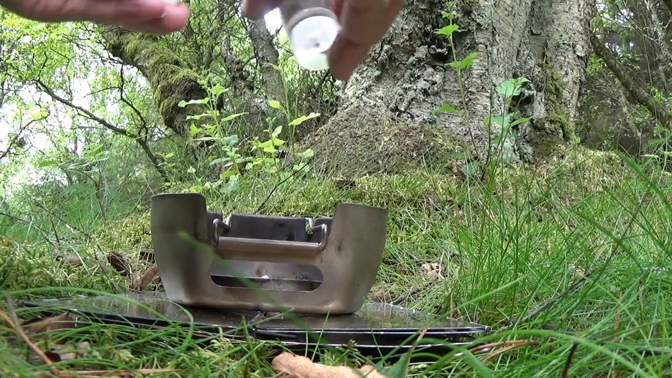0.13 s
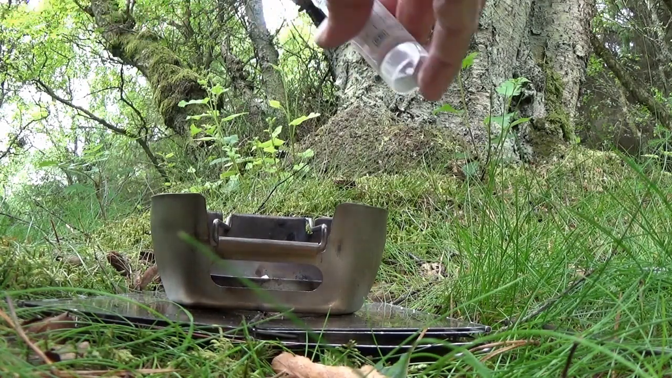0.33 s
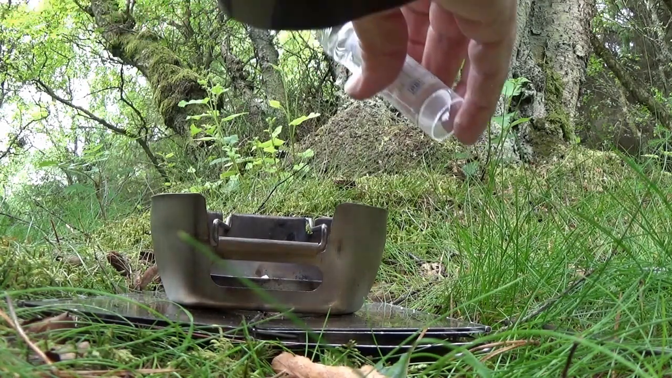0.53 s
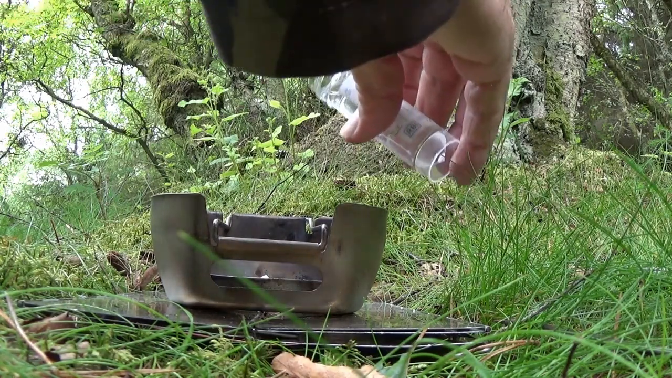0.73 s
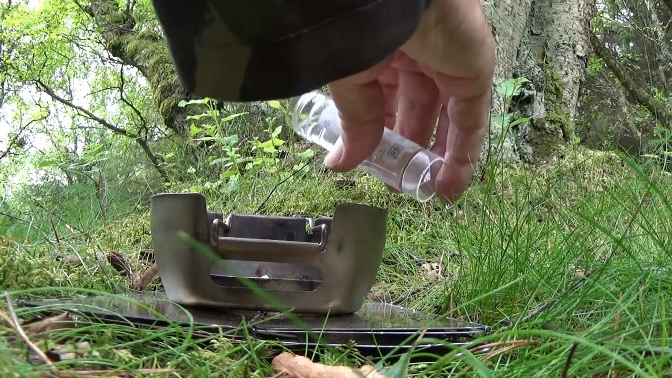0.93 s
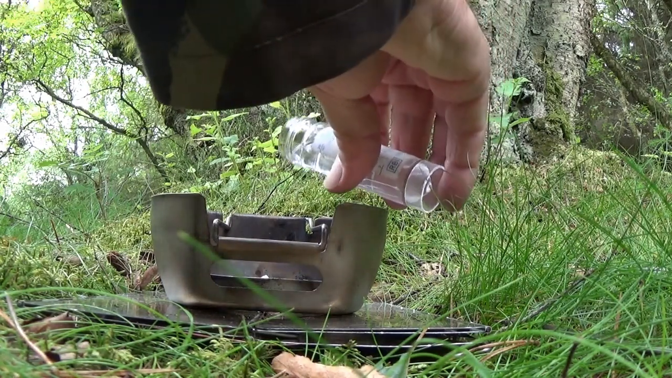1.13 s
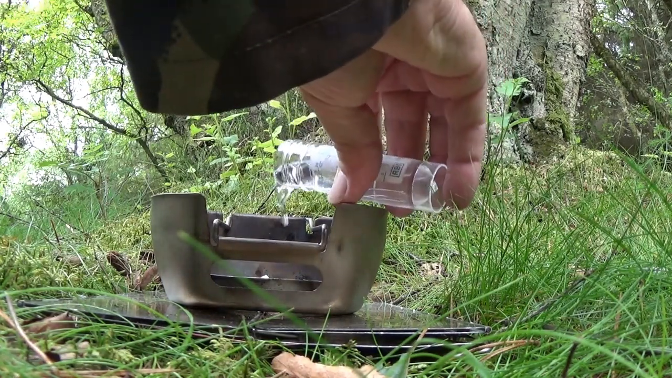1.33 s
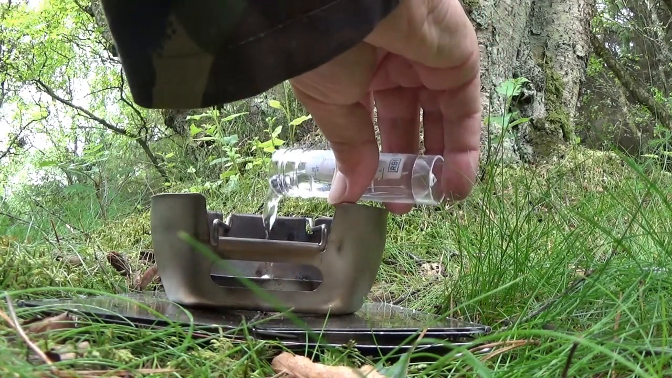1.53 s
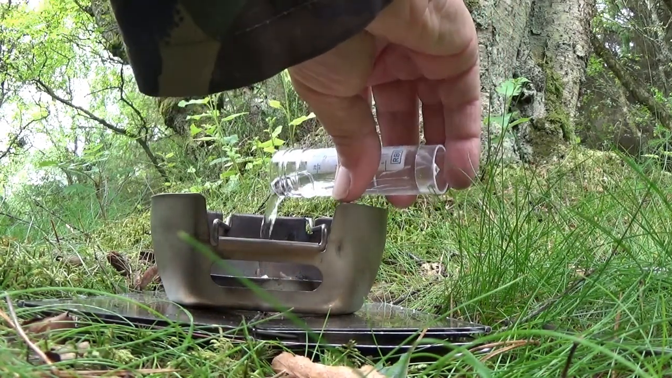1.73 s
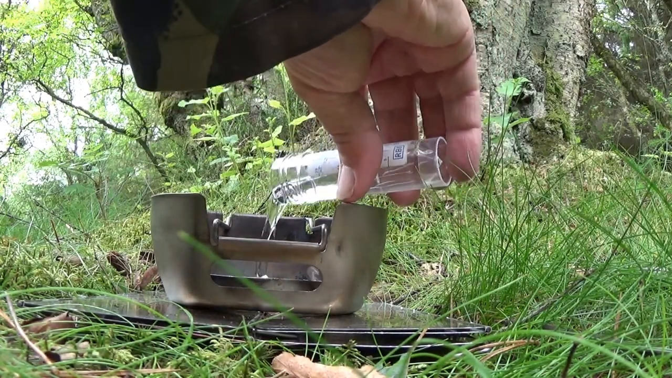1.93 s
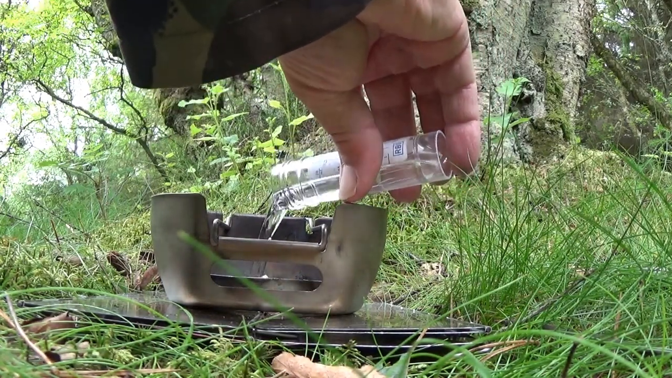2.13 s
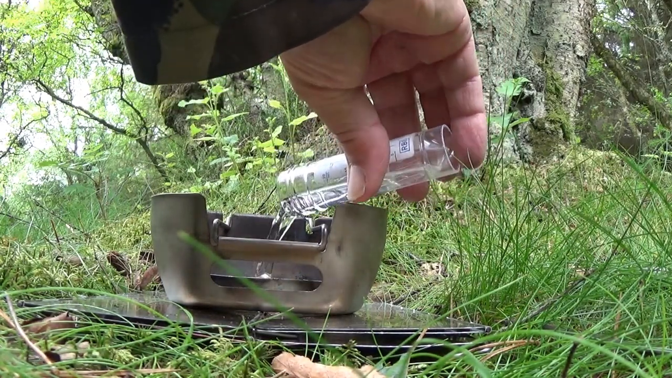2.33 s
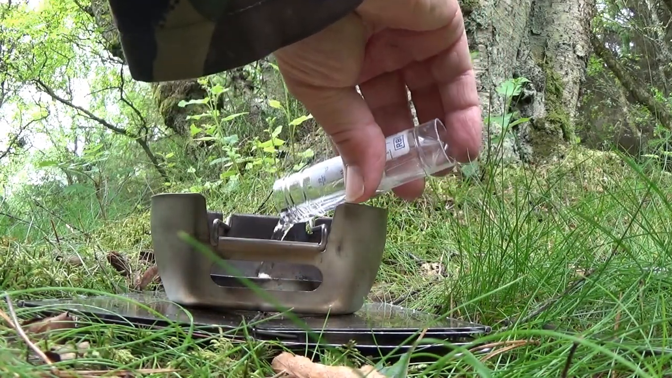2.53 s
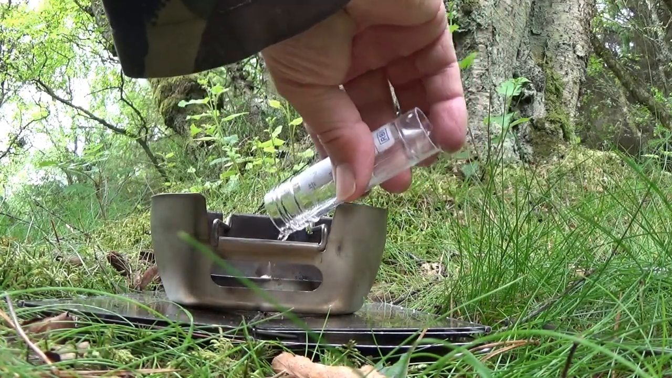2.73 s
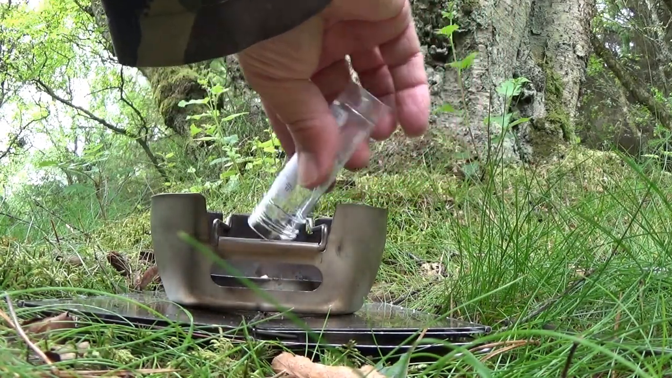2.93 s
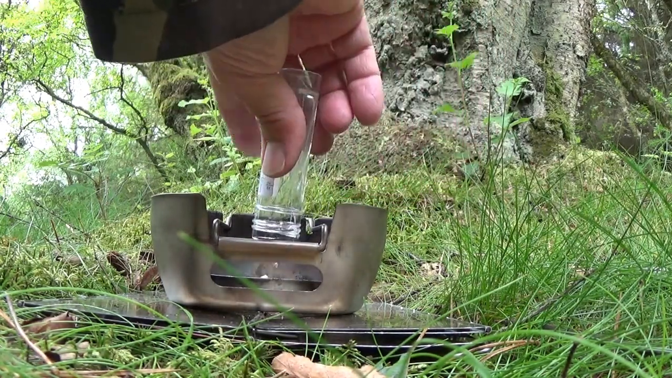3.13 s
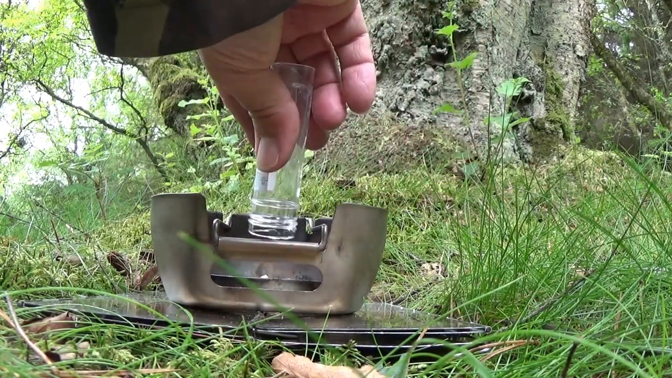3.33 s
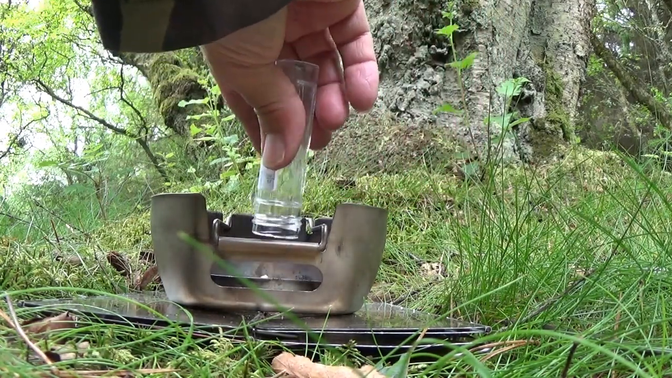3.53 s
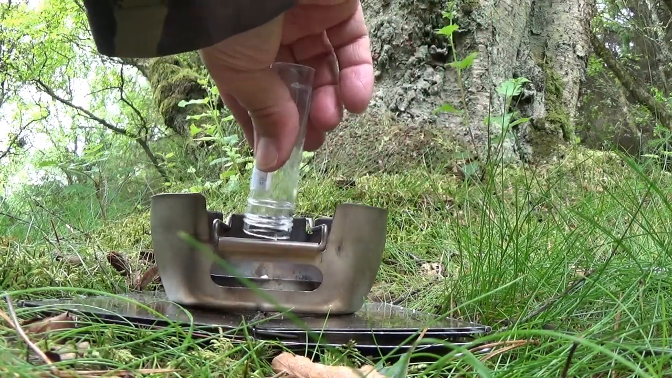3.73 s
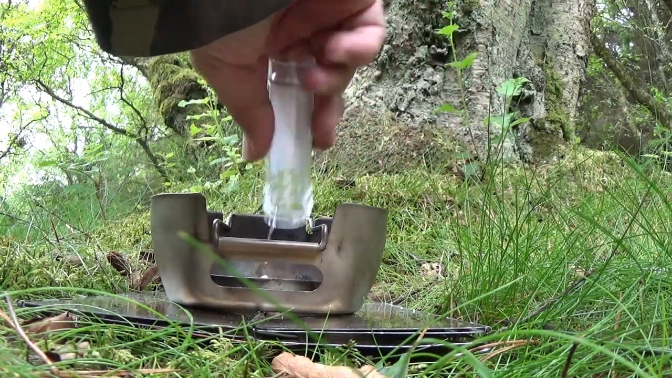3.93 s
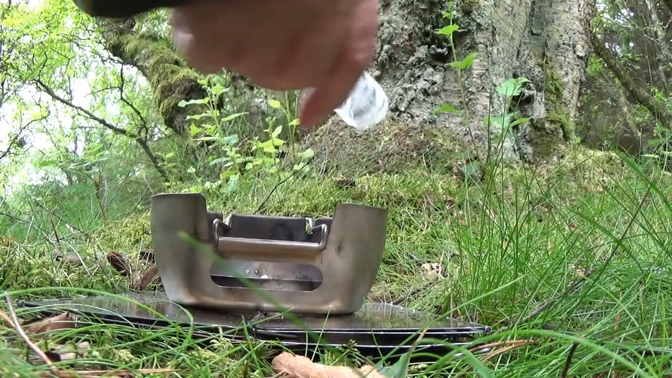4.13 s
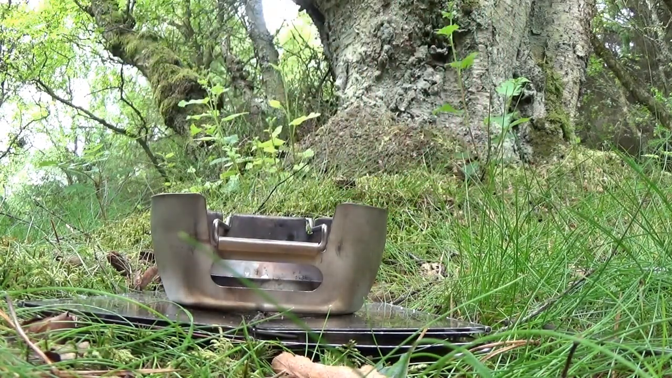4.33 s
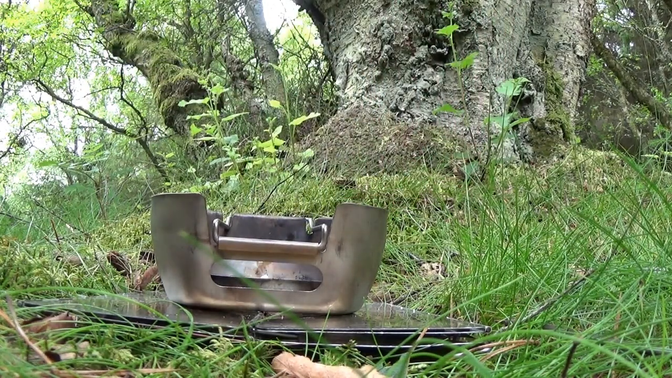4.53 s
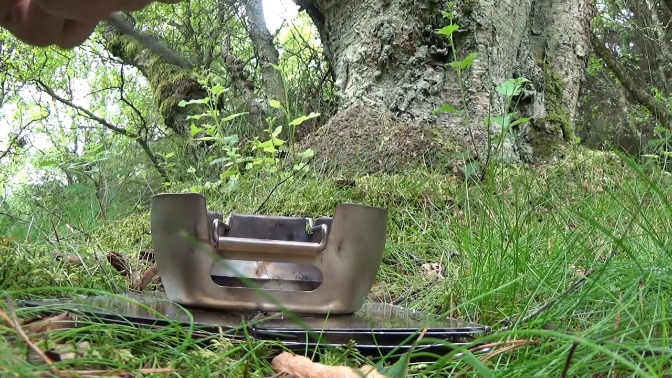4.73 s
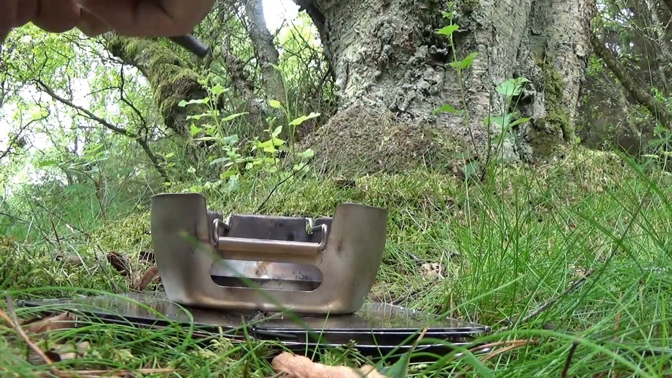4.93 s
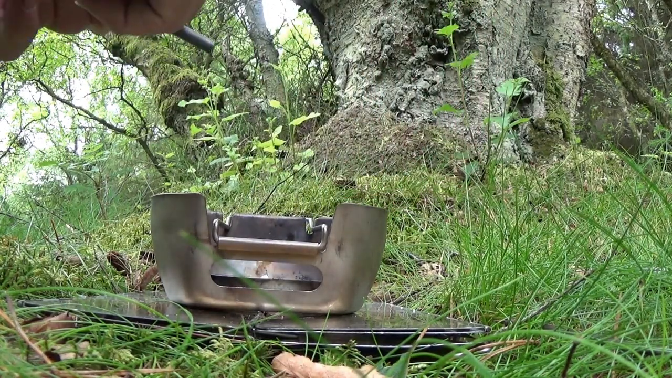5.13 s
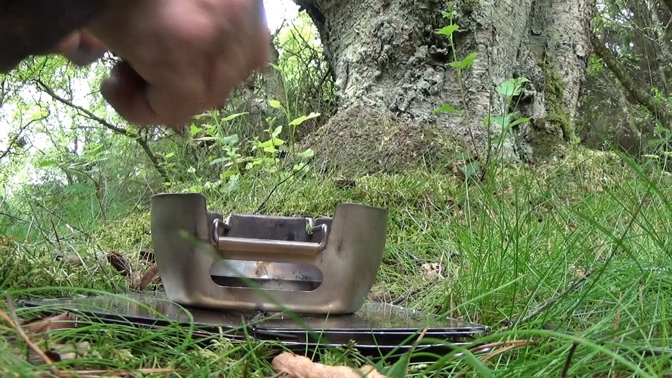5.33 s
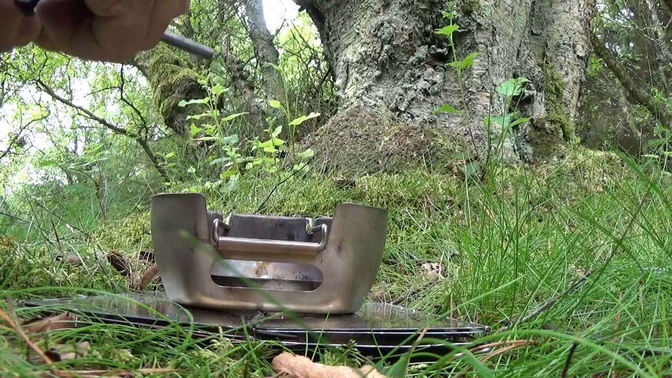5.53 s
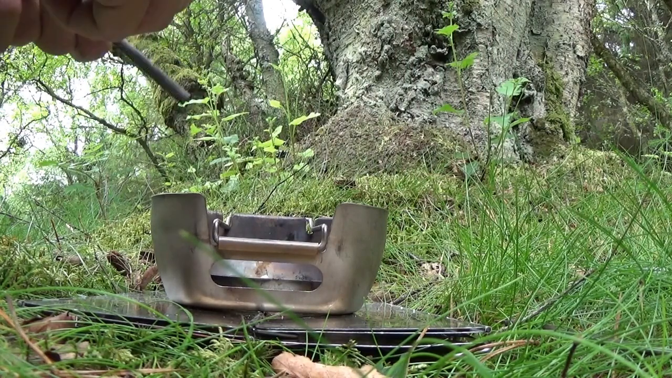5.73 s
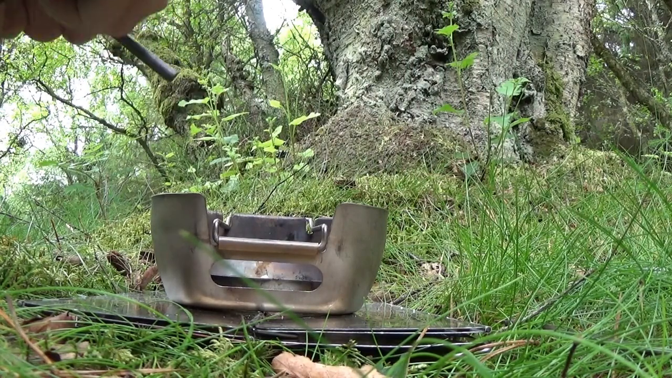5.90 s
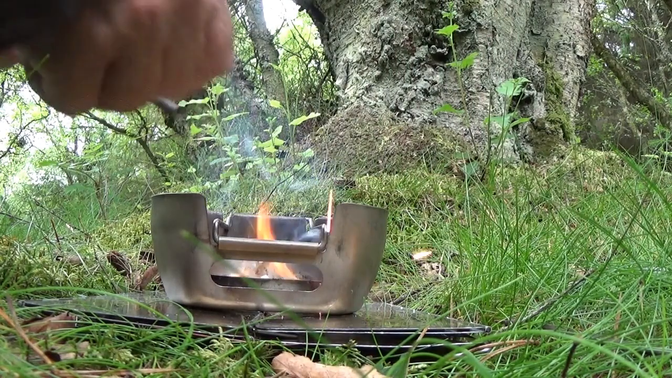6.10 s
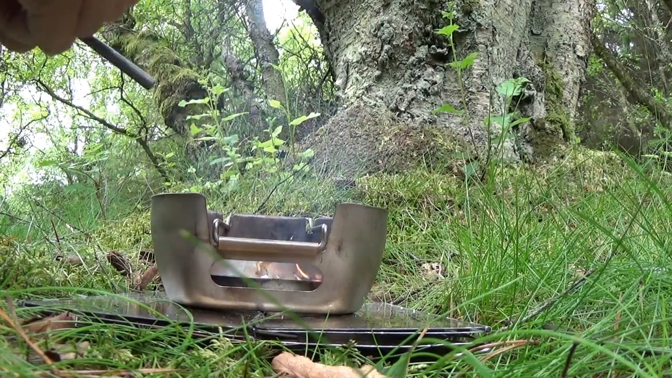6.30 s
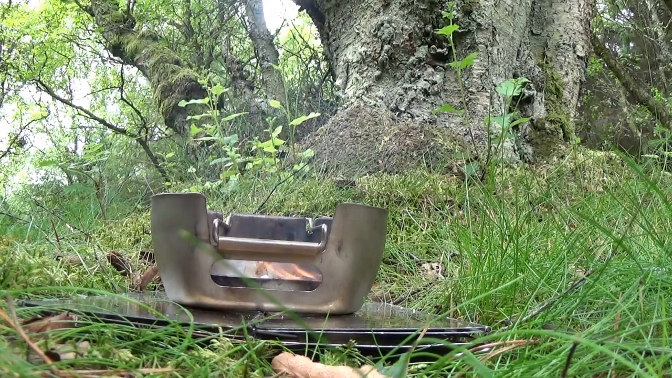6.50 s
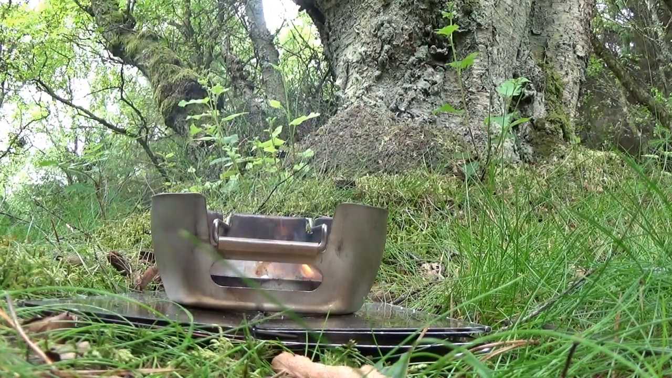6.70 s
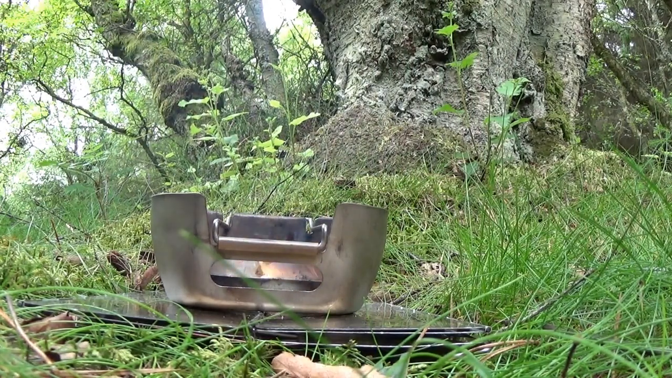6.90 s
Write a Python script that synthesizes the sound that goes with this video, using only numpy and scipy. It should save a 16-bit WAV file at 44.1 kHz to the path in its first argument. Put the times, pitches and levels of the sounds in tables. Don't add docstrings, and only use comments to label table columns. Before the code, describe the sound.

In quiet woods with faint birds, cloth rubs, a bottle taps a metal stove four times, and a spark rod is knocked and harshly scraped twice.

```python
import sys
import numpy as np
from scipy import signal
from scipy.fft import rfft, irfft, next_fast_len
from scipy.io import wavfile
from scipy.ndimage import uniform_filter1d

SR = 44100
rng = np.random.default_rng(int(sys.argv[2]) if len(sys.argv) > 2 else 0)


def bounce(signal):
    frames = np.transpose(np.atleast_2d(signal))
    limited = np.clip(frames, -1, 1)
    pcm = np.round(limited * 32767).astype(np.int16)
    wavfile.write(sys.argv[1], SR, pcm)


def decibels_to_gain(level_db):
    exponent = np.asarray(level_db, float) / 20
    return 10 ** exponent


N = 306936
SECONDS = np.arange(N) / SR

# pitch_hz, level_db, time to fall 60 dB (fade_s)
ROD = [(1490, -54, 0.012), (3200, -46, 0.024), (4720, -31, 0.012), (6030, -44, 0.023), (6700, -21.5, 0.019),
       (7600, -10.5, 0.003), (8800, -15.5, 0.009), (10880, -12.5, 0.0071), (13420, -50, .008)]


def read(points, hz):
    f, value = np.transpose(points)
    return np.interp(np.log(hz + 1), np.log(f + 1), value)


def evened(x):
    return x / np.sqrt(np.mean(x ** 2) + 1e-20)


def peaked(x, db):
    return decibels_to_gain(db) * x / abs(x).max()


def add(mix, s, sound):
    part = mix[..., round(s * SR):][..., :sound.shape[-1]]
    part += sound[..., :part.shape[-1]]


def sides(pan_db):
    return decibels_to_gain(np.array([.5, -.5])[:, None] * pan_db)


def above(x, hz):
    return signal.sosfilt(signal.butter(N=3, Wn=hz, btype="high", fs=SR, output="sos"), x)


def coloured(x, gain):
    size = next_fast_len(len(x) + 2048)
    hz = np.fft.rfftfreq(size, 1 / SR)
    return irfft(rfft(x, size) * gain(hz), size)[:len(x)]


def thirds(x, points, low_hz, high_hz):
    def low(f):
        return 1 / (1 + (f / low_hz) ** 4)

    def high(f):
        return 1 - 1 / (1 + (f / high_hz) ** 6)

    def middle(f):
        return 1 - low(f) - high(f)

    return [evened(coloured(x, lambda f: decibels_to_gain(read(points, f)) * share(f))) for share in (low, middle, high)]


def grains(per_s, spread_db, hiss):
    size = decibels_to_gain(spread_db * np.minimum(rng.exponential(1, N), 3.6)) * rng.standard_normal(N)
    clicks = size * (rng.random(N) < per_s / SR)
    return evened(clicks) + hiss * rng.standard_normal(N)


def rung(modes, spread):
    t = np.arange(3000) / SR
    luck = rng.uniform(-1, 1, (len(modes), 2))
    total = np.zeros(len(t))
    for (hz, db, fade_s), (louder, sharper) in zip(modes, luck):
        fading = decibels_to_gain(db + 130 * spread * louder - 60 * t / max(fade_s, .001))
        total += fading * np.sin(2 * np.pi * hz * (1 + spread * sharper) * t)
    return total


def swells(rows, roundness, low_db):
    peak, rise_ms, fall_ms, db, bright_db = np.transpose(rows)[..., None]
    t = SECONDS[::32]
    span_s = np.where(t < peak, rise_ms, fall_ms).clip(1) / 1000
    shape_db = db - 10 * abs((t - peak) / span_s) ** roundness
    gains = []
    for rel_db in (low_db(db, bright_db), 0, bright_db):
        power = decibels_to_gain(np.maximum(shape_db + rel_db, -200)) ** 2
        gains.append(np.interp(SECONDS, t, np.sqrt(power.sum(0))))
    return np.array(gains)


def woods():
    # pitch_hz, level_db (per Hz)
    air = [(18, -56), (30, -15), (141, -18.5), (295, -6), (2230, -7), (2410, -7), (2610, -12), (3310, -6.5),
           (4300, -13), (9220, -12.5), (16000, -20)]
    # pitch_hz, likeness (0 to 1)
    likeness = [(60, 0.5), (180, 0.88), (550, 0.067), (1650, 0.037), (4970, 0.53), (15000, 1)]
    frames, hz = N // 256 + 5, np.fft.rfftfreq(1024, 1 / SR)
    a, b, c, d, patches = rng.standard_normal((frames, 513, 5)).T
    patches = evened(uniform_filter1d(uniform_filter1d(patches, 12, 0), 14, 1))
    same = np.clip(read(likeness, hz), -1, 1)[:, None]
    left = a + 1j * b
    right = same * left + np.sqrt(1 - same ** 2) * (c + 1j * d)
    z = np.array([left, right]) * decibels_to_gain(read(air, hz)[:, None] + patches)
    return decibels_to_gain(-65) * evened(signal.istft(z, nperseg=1024, noverlap=768)[1][:, :N])


def trill():
    # time_s, level_db
    loudness = [(1.3, -60), (2, -63.5), (3, -63.5), (3.4, -60.5)]
    beat = (SECONDS - 1.359) * 25
    pips = np.exp(-((beat - np.round(beat)) / 0.1) ** 2) * np.sin(2 * np.pi * 2450 * SECONDS)
    odd = (beat - 1) / 2
    pips += 1.5 * np.exp(-((odd - np.round(odd)) / .008) ** 2) * np.sin(2 * np.pi * 3500 * SECONDS)
    return pips * decibels_to_gain(np.interp(SECONDS, *np.transpose(loudness), left=-150, right=-150))


def phrase(count):
    start_s, gap_s, length_s = 1.33, .157, 0.063
    return [(start_s + k * gap_s, length_s, 8850, 8040, -64.5 - 0.76 * k) for k in range(count)]


def note(start, length, hz0, hz1, db, waver, early):
    u = np.linspace(0, 1, max(round(length * SR), 9))
    drift, shake = rng.standard_normal((2, SR // 2))[:, :len(u)]
    hz = np.interp(u, [0, .35, 1], [hz0, hz0 + early * (hz1 - hz0), hz1])
    hz = uniform_filter1d(hz, len(u) // 5, mode="nearest")
    hz *= 1 + waver * evened(uniform_filter1d(drift, 70))
    flutter = 1 + 0.35 * evened(uniform_filter1d(shake, 300))
    tone = np.sin(2 * np.pi * np.cumsum(hz) / SR)
    return np.sqrt(2) * decibels_to_gain(db) * flutter * tone * signal.windows.tukey(len(u), .45)


def birds():
    # start_s, length_s, start_hz, end_hz, level_db
    whistles = [(0, 0.053, 4400, 4300, -66.5), (0.942, 0.084, 4740, 4680, -62),
                (1.298, 0.051, 2600, 2350, -66.5), (1.345, .028, 6500, 4080, -60),
                (1.372, 0.064, 4130, 4580, -62), (1.05, 0.13, 5310, 5180, -69.5),
                (2.845, 0.1, 6000, 4990, -71), (3.012, 0.076, 4720, 4760, -65.5),
                (3.1, 0.041, 4950, 5000, -68), (3.235, .078, 6700, 4280, -68),
                (3.31, 0.07, 4250, 4170, -72), (3.46, 0.097, 4650, 4490, -71),
                (3.366, 0.428, 2090, 1977, -68), (3.442, 0.17, 2570, 2250, -66),
                (3.678, 0.065, 6160, 5070, -67), (3.942, .102, 4660, 4570, -68),
                (5.73, 0.081, 3660, 3710, -60), (5.807, .06, 5600, 5850, -58),
                (5.99, 0.033, 8650, 8660, -55)]
    # start_s, length_s, start_hz, end_hz, level_db
    hooks = [
        (1.72, .07, 5850, 5400, -65),
        (1.785, .075, 3750, 3260, -68),
        (2.105, .1, 3950, 3700, -67),
        (3.75, .28, 1910, 2580, -62.5),
    ]
    # start_s, length_s, start_hz, end_hz, level_db
    buzzes = [(3.003, .075, 8300, 8700, -63), (3.13, .04, 8700, 8800, -60), (5.0, .267, 4300, 4110, -60),
              (4.93, .14, 7600, 7350, -59.5), (5.64, .38, 5680, 5700, -64), (5.988, .062, 5620, 5720, -56),
              (5.845, .098, 5950, 5850, -58.5), (5.84, .03, 8600, 8650, -60)]
    direct = np.zeros(N)
    for row in whistles:
        add(direct, row[0], note(*row, waver=0.011, early=.52))
    for row in hooks:
        add(direct, row[0], note(*row, waver=0.009, early=.95))
    for row in buzzes + phrase(count=6):
        add(direct, row[0], note(*row, waver=0.0253, early=.52))
    t = np.arange(SR // 2) / SR
    echoes = rng.standard_normal((2, len(t))) * decibels_to_gain(-60 * t / .85)
    echoes /= np.linalg.norm(echoes[0])
    wet = signal.oaconvolve(direct[None], echoes, axes=1)[:, :N]
    return direct * sides(0.52) + decibels_to_gain(-2.5) * wet + trill()


def sleeve():
    # pitch_hz, level_db (per Hz)
    cloth = [(24, -65), (40, -46), (112, -22.5), (412, -4.5), (680, -2), (1240, -7), (1760, -7.5),
             (2210, -6.5), (6650, -5.5), (7540, -6), (9940, -1.5), (12800, -10), (16000, -20.5)]
    # peak_s, rise_ms, fall_ms, rub level_db, brightness_db
    moves = [(.1, 44, 160, -62.5, -8), (.31, 125, 160, -51.5, -3.5), (.47, 164, 91, -48.5, -3),
             (.56, 83, 130, -47.5, -7.5), (.69, 110, 106, -47.5, -2), (.78, 89, 104, -49.5, -4),
             (.95, 310, 250, -62.5, 2), (1.5, 2400, 1500, -69, -9.5), (3.05, 89, 53, -67.5, 8),
             (3.1, 450, 1100, -68.5, -29), (3.16, 23, 30, -70, 10), (4.048, 26, 10, -56.5, 8.5),
             (4.2, 300, 300, -53.5, -6), (4.39, 174, 190, -48.5, -11.5), (4.48, 20, 75, -69, 12),
             (4.72, 120, 152, -44.5, -2), (5.03, 280, 250, -53, -11.5), (5.41, 162, 100, -47.5, -7),
             (5.62, 180, 290, -57, -8), (5.92, 84, 71, -64.5, 4), (6.29, 258, 73, -48, -7),
             (6.5, 122, 240, -48, -4.5), (6.72, 214, 185, -43, -7.5), (6.86, 114, 87, -41.5, -13)]
    # time_s, peak_db, pitch_hz
    pops = [(0.246, -49, 2340), (0.369, -49, 657), (0.385, -41, 780), (0.429, -41.5, 412),
            (0.484, -40, 503), (0.524, -44, 676), (0.588, -39, 540), (0.599, -35.5, 690), (0.663, -44, 623),
            (0.746, -44, 487), (0.774, -44, 960), (0.809, -46, 430), (0.882, -53, 314), (4.969, -35, 2450),
            (5.349, -34, 537), (5.39, -33, 507), (5.3913, -22.5, 950), (6.128, -28.5, 523),
            (6.155, -32.5, 476), (6.618, -26, 1730), (6.677, -28.5, 1020), (6.721, -28, 1330),
            (6.754, -29, 700), (6.785, -41, 740), (6.849, -32, 800)]
    folds = thirds(grains(650, 4.0, .75), cloth, 1150, 6800)[0]
    threads = thirds(grains(7000, 2.1, 1.0), cloth, 850, 7000)[1:]
    level = swells(moves, 1.9, lambda db, bright: -7.5 + 0.16 * (db + 47) - 0.16 * bright)
    rub = (level * ([folds] + threads)).sum(0)
    _, _, z = signal.stft(rub, SR, nperseg=512)
    patches = rng.standard_normal(z.shape[::-1]).T
    patches = evened(uniform_filter1d(uniform_filter1d(patches, 7, 0), 9, 1))
    rub = signal.istft(z * decibels_to_gain(1.95 * patches), SR, nperseg=512)[1][:N]
    for s, db, hz in pops:
        pop = rung([(hz, 0, .016), (hz * 1.82, -4, .008), (hz * 2.63, -8, .005)], 0.08)
        add(rub, s, peaked(above(pop, 0.43 * hz), db))
    return rub


def knocks():
    # time_s, peak_db, thud_db (against the clack)
    blows = [
        (3.3755, -20, -14.5),
        (3.5802, -18, -13.5),
        (3.7694, -16.5, -16),
        (3.9303, -18.5, -15),
    ]
    # pitch_hz, level_db, fade_s (to fall 60 dB)
    bottle = [(2180, -5, 0.0086), (2870, -16, 0.035), (4620, -15, 0.036), (5730, -7, 0.013),
              (4950, 1, 0.0078), (7600, 6.5, 0.0029), (8100, -3, 0.015), (9190, 7.5, 0.0054),
              (9820, 5.5, 0.0058), (10980, 2.5, 0.016), (12500, -26, 0.0067), (15300, -12, .005)]
    # pitch_hz, level_db, fade_s (to fall 60 dB)
    stove = [(335, 7.5, 0.019), (480, 18, 0.0072), (687, 8.5, 0.022), (917, 8, 0.032)]
    out, t = np.zeros(N), np.arange(300) / SR
    for s, db, thud_db in blows:
        rattle = rng.standard_normal(len(t)) * decibels_to_gain(-18.0 - 60 * t / 0.012)
        rattle[0] = 1
        clack = signal.oaconvolve(rung(bottle, .012), rattle)
        add(out, s + 0.00037, peaked(above(clack, 1900), db))
        thud = np.convolve(rung(stove, 0.036), np.hanning(16))
        add(out, s + 0.00135, peaked(above(above(thud, 217), 110), db + thud_db + 1))
    return out


def ticks(rows, chatter_s):
    out, t = np.zeros(N), np.arange(600) / SR
    for s, db, hz in rows:
        snap = rung([(hz, 0, .0028), (hz * 1.31, -4, .002), (hz * 1.29, -4, .0025), (hz * 2.63, -8, .002)], 0.15)
        near = [(f, level - 3 * abs(np.log2(f / hz)), fade_s) for f, level, fade_s in ROD]
        near.append((hz, 0, .007))
        body = peaked(snap, 0) + peaked(rung(near, .02), -6)
        fading = 0.17 * decibels_to_gain(-60 * t / max(chatter_s, .0005)) + decibels_to_gain(-38 - 60 * t / 0.028)
        slips = rng.standard_normal(len(t)) * fading
        slips[0] = 1
        contact = np.convolve(slips, np.hanning(6))
        add(out, s + 0.00041, peaked(above(signal.oaconvolve(body, contact), 2450), db))
    return out


def creaks():
    # time_s, peak_db, loudest pitch_hz
    rows = [(0.089, -34, 10300), (1.259, -39, 3600), (2.5558, -36, 5530), (3.1844, -48, 11500),
            (3.2547, -35.5, 9600), (3.2954, -43, 9200), (3.3278, -45.5, 9600), (3.3444, -43, 10500),
            (3.405, -49, 10600), (3.441, -42, 10200), (3.6594, -45, 10000), (3.714, -43, 11200),
            (3.8444, -49.5, 10430)]
    return ticks(rows, chatter_s=.0065)


def strikes():
    # time_s, peak_db, loudest pitch_hz
    rows = [(4.9436, -18.5, 5840), (4.9544, -29, 4800), (4.9735, -24, 3500), (5.3242, -18, 10700),
            (5.3278, -11, 6160), (5.3332, -5, 5000), (5.3423, -9, 10400), (5.4397, -29, 5130),
            (5.5288, -7.5, 7800), (5.5479, -24, 4700), (5.5613, -34, 8900), (5.581, -13.5, 6700),
            (5.6436, -6, 7600), (5.668, -9.5, 6740), (5.7045, -14.5, 7000), (5.876, -7, 4430),
            (5.8762, -7.5, 9300)]
    return ticks(rows, chatter_s=.0045)


def sparks():
    # time_s, peak_db, loudest pitch_hz
    rows = [(6.0255, -23, 3500), (6.0593, -30, 4400), (6.0672, -9, 4600), (6.077, -8, 8800),
            (6.0831, -15, 4430), (6.1035, -7, 9310), (6.1134, -24, 9180), (6.126, -9, 7800),
            (6.1504, -30, 4020), (6.1674, -23, 5810), (6.1753, -21, 4600), (6.1999, -15, 7600),
            (6.2597, -32, 4100), (6.2751, -24, 10500), (6.289, -29.5, 3470), (6.301, -33, 7500),
            (6.3174, -31, 8950), (6.356, -29, 8000), (6.3944, -33, 5580), (6.4617, -22.5, 9100),
            (6.6159, -24, 4900)]
    return ticks(rows, chatter_s=.0055)


def strokes():
    # time_s, pressure_db
    pressures = [
        [(5.288, -43), (5.296, -33.5), (5.322, -26), (5.334, -31), (5.338, -53), (5.344, -34), (5.358, -50)],
        [(6.024, -47), (6.029, -29), (6.05, -30), (6.075, -27), (6.09, -26.5), (6.101, -37), (6.115, -24.5),
         (6.123, -36), (6.131, -27.5)],
    ]
    richness = [-0.5, 2]
    # peak_s, rise_ms, fall_ms, pressure_db, brightness_db
    short_slips = [(4.947, 2, 14, -44, 0), (4.978, 14, 30, -46.5, -9), (5.532, 2, 5, -42, 14),
                   (5.55, 3, 3, -29, -1), (5.562, 2, 11, -36, -3), (5.685, 3, 5, -36, -3),
                   (5.702, 7, 4, -31, -5), (6.152, 20, 7, -35, -9), (6.177, 12, 10, -39, -1)]
    # pitch_hz, level_db (per Hz)
    grit = [(59, -56), (100, -24.5), (452, -10.5), (1010, -13.5), (1200, -11), (1800, -14.5), (3700, -4.5),
            (4290, -1.5), (6290, -5), (10200, -1.5), (16000, -25)]
    low, middle, high = thirds(grains(11000, 2.2, .8), grit, 1720, 5100)
    ring = signal.oaconvolve(grains(700, 5.0, .1), above(rung(ROD, 0.0066), 1300))[:N]
    middle = evened(middle + .75 * evened(ring))
    level = swells(short_slips, 1.3, lambda db, bright: -19.5)
    for rows, spark_db in zip(pressures, richness):
        s, db = np.transpose(rows)
        since = SECONDS - s[0]
        lift_db = -10 * np.clip((SECONDS - s[-1]) / 0.0032, 0, 20)
        pressure_db = np.interp(SECONDS, s, db, left=-150) + lift_db
        body_db = np.interp(since, [.03, .058], [-34, -8.5 + spark_db])
        edge_db = np.interp(since, [0, 0.033], [-32, 4 + spark_db])
        level = level + decibels_to_gain(pressure_db + np.array([body_db, 0 * since, edge_db]))
    level = uniform_filter1d(level, 60, axis=1)
    return (level * [low, middle, high]).sum(0)


def scene():
    # pitch_hz, side level_db (against the middle)
    width = [(60, -16), (130, -16), (290, -20), (640, -2), (1410, 2), (3100, -8), (6820, 0.5), (15000, -8)]
    hands = sleeve() + creaks() + strikes() + sparks() + strokes()
    near = hands + knocks()
    scatter = rng.standard_normal(400) * np.exp(-np.arange(400) / 90)
    loose = signal.oaconvolve(near, scatter / np.linalg.norm(scatter))[:N]
    side = coloured(hands, lambda f: np.exp(1.05j + 0 * f)) + .5 * loose
    side = coloured(side, lambda f: decibels_to_gain(read(width, f) - 10.5))
    return woods() + birds() + near + np.array([side, -side])


def top_cut(x):
    return signal.sosfilt(signal.butter(12, 16810, fs=SR, output="sos"), x)


def record(dry):
    edge = signal.firwin(255, 16100, window=("kaiser", 9), fs=SR)
    return top_cut(signal.oaconvolve(dry, edge[None], "same"))


dry = scene()
out = record(dry)
bounce(out)
```